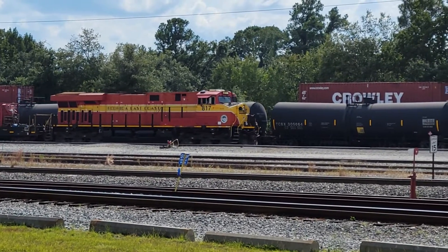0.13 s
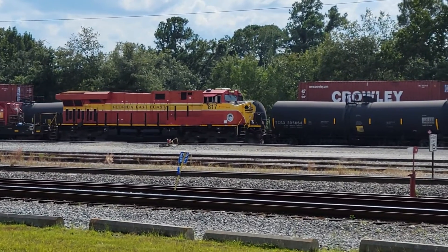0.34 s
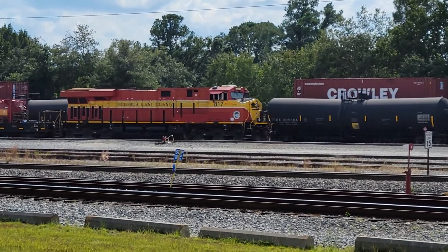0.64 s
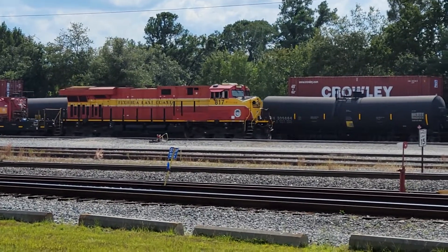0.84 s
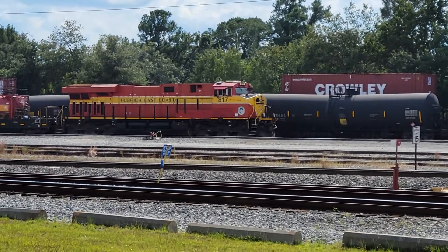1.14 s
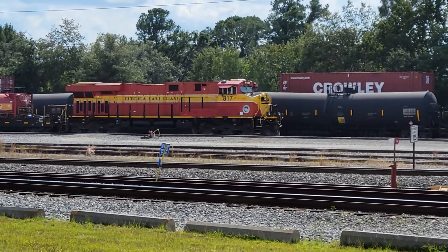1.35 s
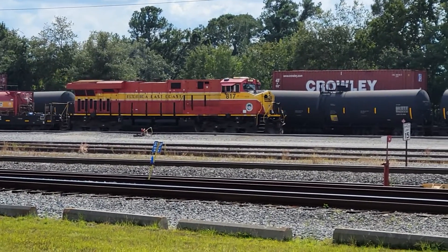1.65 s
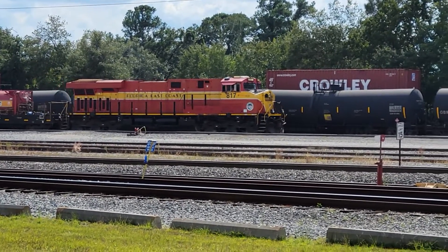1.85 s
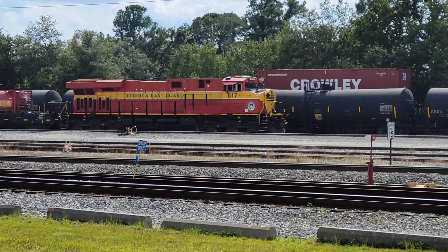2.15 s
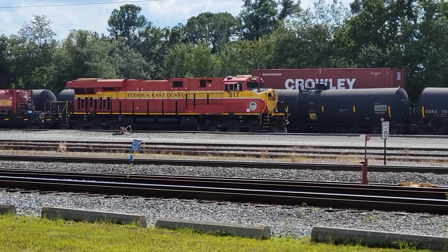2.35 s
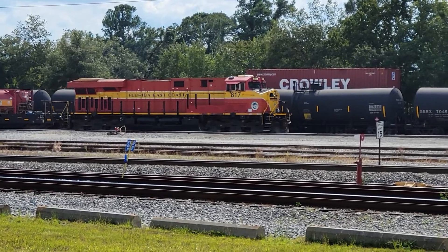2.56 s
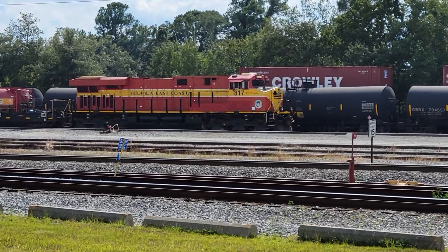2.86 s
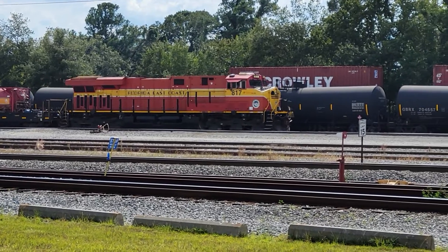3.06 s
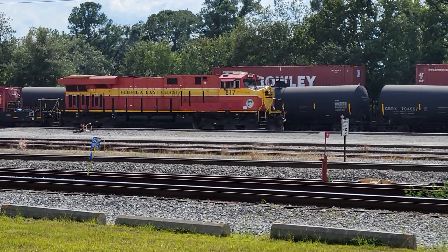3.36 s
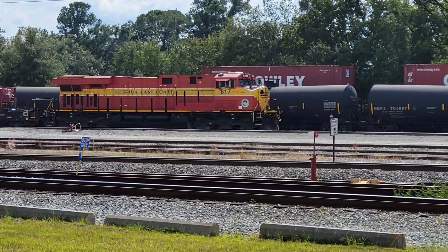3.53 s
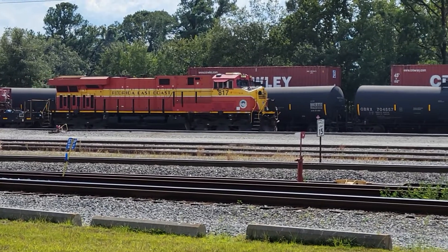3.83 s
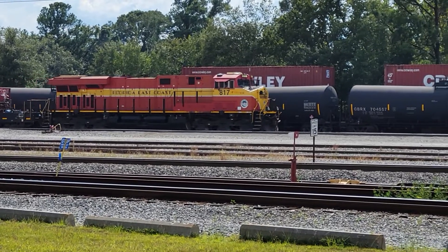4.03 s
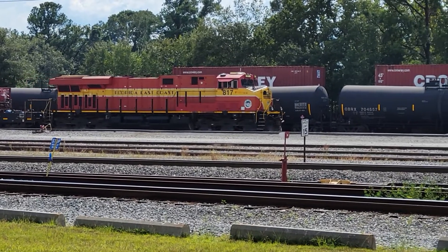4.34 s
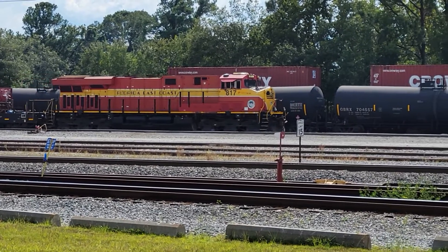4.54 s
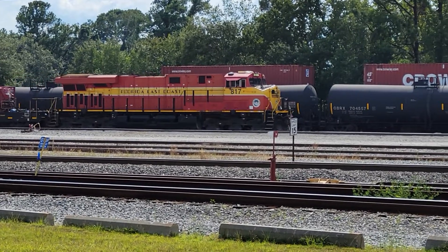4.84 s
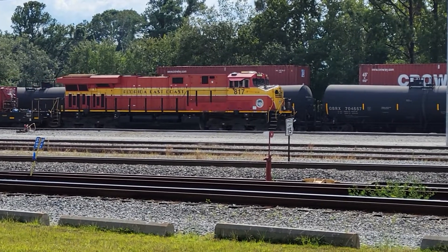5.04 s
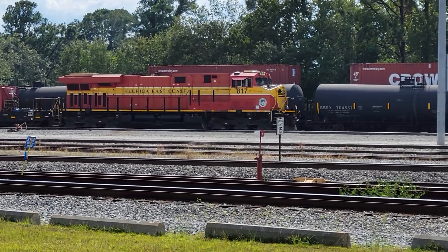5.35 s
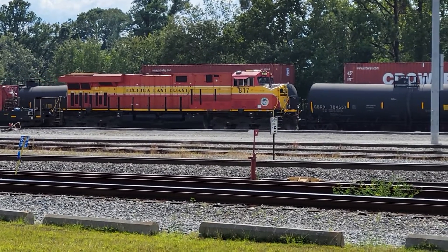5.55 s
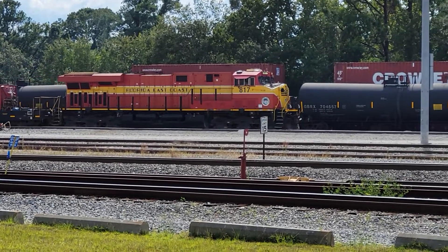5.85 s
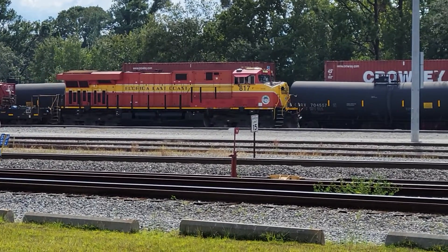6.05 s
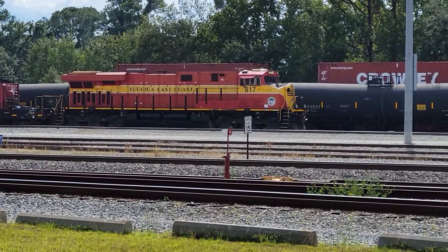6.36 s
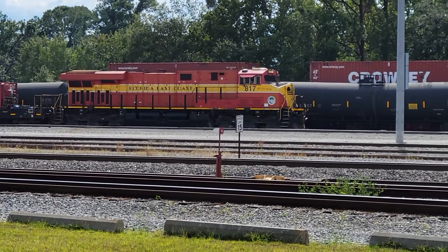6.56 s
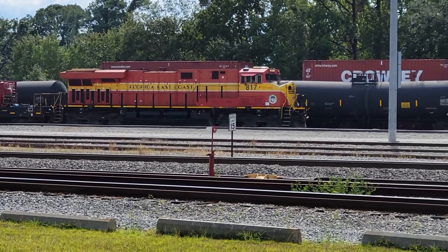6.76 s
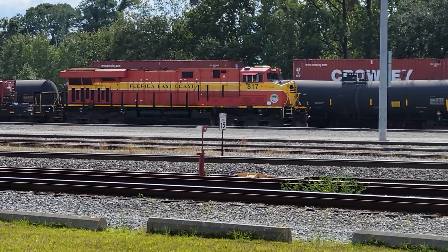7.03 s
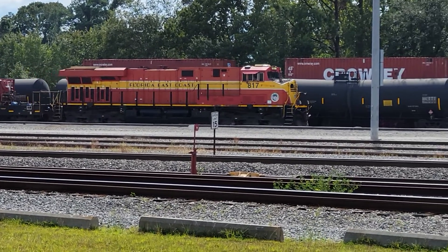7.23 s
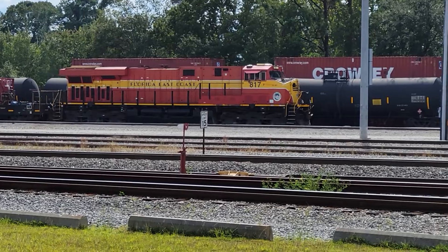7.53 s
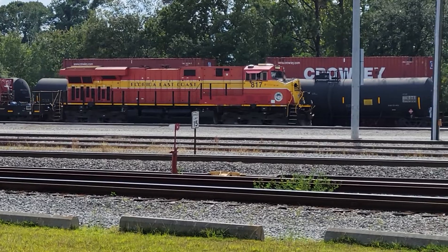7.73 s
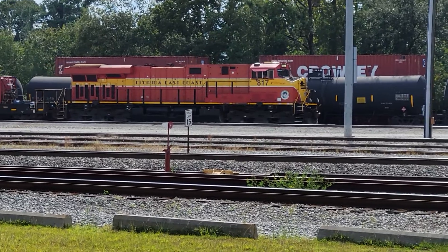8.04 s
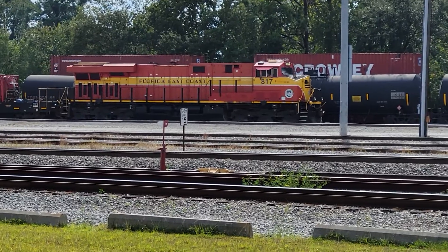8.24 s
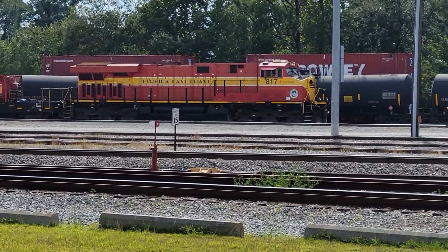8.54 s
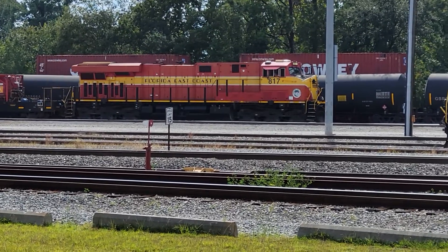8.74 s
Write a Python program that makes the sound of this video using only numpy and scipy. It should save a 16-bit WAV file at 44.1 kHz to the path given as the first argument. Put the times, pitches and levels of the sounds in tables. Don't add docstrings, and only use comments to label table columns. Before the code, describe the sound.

Two big diesel locomotives idle in an open rail yard with a deep, throbbing rumble, fan roar and valve clatter, while insects buzz faintly.

```python
import sys
import numpy as np
from scipy import signal
from scipy.fft import rfft, irfft, next_fast_len
from scipy.io import wavfile
from scipy.ndimage import uniform_filter1d, map_coordinates

SR = 44100
rng = np.random.default_rng(int(sys.argv[2]) if len(sys.argv) > 2 else 0)


def level_to_linear(level):
    exponent = np.asarray(level, float) / 20
    return 10 ** exponent


def to_wav(s):
    ch = np.atleast_2d(s).T
    pcm = np.round(np.clip(ch, -1, 1) * 32767)
    wavfile.write(sys.argv[1], SR, pcm.astype(np.int16))


N = 392049
T = np.arange(N) / SR

CREEP_HZ, STAND_HZ = 4.865, 4.8331

# crank_angle_deg, level_db
CREEP_FIRING = [(31.8, 3.4), (126.5, 1.5), (163.0, 5.7), (234.1, -1.2), (270.2, 4.8), (367.4, -4.1),
                (399.1, -1.3), (467.4, -0.1), (502.6, 4.5), (586.5, -4.1), (643.4, -5.3), (708.8, -1.5)]
STAND_FIRING = [(8.6, -7.4), (91.0, -13.8), (127.9, -1.8), (133.5, -7.0), (246.5, -8.2), (290.8, -12.7),
                (383.2, -8.5), (401.8, -8.1), (508.8, 2.7), (582.7, -3.1), (604.0, -1.8), (626.2, -3.0)]
# pitch_hz, width_hz, level_db
CREEP_STACK = [(58.8, 6.0, -22.4), (74.7, 6.0, -24.5), (95.0, 10.0, -37.4), (168.3, 15.0, -44.6)]
STAND_STACK = [(53.1, 14.7, -20.6), (58.4, 27.5, -23.8), (94.6, 32.5, -37.6), (196.1, 22.7, -69.9)]
# pitch_hz, level_db (of each multiple of the cycle rate)
KNOCK = [(100, -71.5), (130, -43.5), (185, -44), (250, -51), (320, -60), (450, -66.5), (800, -72.5),
         (1200, -80)]
# time_s, direct_gain, far_row_gain, near_row_gain
ECHO_PATHS = [(0.0, .41, .57, .29), (1.11, .6, .37, .3), (2.22, .59, .28, .25), (3.33, .43, .24, .18),
              (4.44, .38, .45, .27), (5.56, .36, .56, .14), (6.67, .4, .63, .18), (7.78, .47, .4, .26),
              (8.89, .61, .5, .15)]
# pitch_hz, level_db
HUMS = [(165.7, -38), (207.8, -46.5), (211, -49.5), (226.7, -44.5), (218.7, -36.5), (235.3, -44),
        (268.4, -45.5), (296, -54.5), (368, -54), (459.6, -61), (516.5, -62.5), (636, -58.5), (751, -59.5),
        (1158, -57.5)]
# pitch_hz, level_db (per Hz)
RUMBLE = [(15, -27), (30, -7.5), (60, -1.5), (100, -5), (120, -8.5), (180, -8.5), (250, -17), (320, -21.5),
          (400, -35), (600, -44), (1200, -88)]
# pitch_hz, level_db (per Hz)
FANS = [(210, -34.5), (350, -8.5), (575, -16.5), (724, -2), (851, -11.5), (976, -3), (1410, -3),
        (1590, -5.5), (1850, -0.5), (2500, -14), (2700, -8.5), (3510, -32.5), (5940, -120)]
# pitch_hz, width_hz, level_db
DUCTS = [(720, 170, -8), (972, 71, 1.5), (1404, 51, -0.5), (1875, 95, 2)]
# pitch_hz, level_db (per Hz)
CLATTER = [(880, -33), (1500, -5.5), (1600, -5.5), (1870, 0.5), (2060, 1), (2370, -7.5), (2510, -16),
           (3200, -10), (4470, -18.5), (4880, -12.5), (6760, -19), (8290, -27), (9370, -42), (10500, -38.5),
           (13600, -66.5), (22000, -120)]
# pitch_hz, width_hz, level_db
CASING = [(2320, 100, 0), (2753, 120, 4), (3260, 100, -4.5), (4137, 75, 1.5), (4900, 100, -5)]
# crank_angle_deg, rise_db, width_deg
VALVES = [(5, 4, 40), (95, 1.5, 15), (286, 0.8, 140), (370, 1.5, 38), (510, 2, 36), (625, 1.5, 6.6)]
# time_s, level_db
CARRY = [(0, 0), (.55, -.5), (1.45, 3), (1.8, -2), (2.7, -2), (3.4, -0.5), (3.65, -3), (3.9, -1.5),
         (4.2, 0.5), (4.7, 0.3), (5.3, 0.5), (6.4, 1), (7.3, 1), (8.89, .5)]
# pitch_hz, level_db (per Hz)
TREES = [(5200, -34.5), (8800, -4), (9500, -12.5), (10800, -9), (12200, -2.5), (13400, -2.5), (14200, -8.5),
         (15700, -10), (17000, -12)]
# pitch_hz, level_db, fade_by_60_db_s
WING = [(13550, 8, .008), (13050, 7, .008), (11960, -13, .06)]
# start_s, peak_db, pitch_hz
SPITS = [(0.825, -31, 2840), (1.072, -28, 2790), (1.158, -30.5, 3700), (4.289, -31.5, 3260),
         (4.51, -34, 3250), (5.222, -28, 6000), (6.05, -32, 6500), (6.109, -29, 4140), (7.284, -25.5, 2730),
         (7.402, -32.5, 3470), (7.825, -23.5, 3100), (8.018, -31.5, 3240), (8.53, -31, 6000),
         (8.623, -35, 2730)]
# start_s, end_s, start_pitch_hz, end_pitch_hz, level_db
FLANGE = [(2.48, 3.1, 5670, 5680, -53.5), (2.62, 3.12, 7460, 7480, -63), (2.82, 3.12, 8310, 8320, -65),
          (2.85, 3.2, 4860, 4840, -59), (2.42, 2.85, 9950, 10000, -73), (3.0, 3.55, 10200, 10320, -72)]
# pitch_hz, likeness (1 = the same)
ALIKE = [(60, 1), (130, 0.83), (290, 1), (640, 0.35), (1410, 0.63), (3100, 0.69), (6820, 0.17),
         (15000, 0.32)]
# pitch_hz, lead_radians
LEAD = [(30, 0.5), (70, 0.29), (140, -0.38), (300, 0.63), (2300, -0.24), (2600, 1.5), (4100, 0.98),
        (7000, 0.1), (10600, 2), (12700, -0.5), (15200, -11)]
# pitch_hz, difference_db
TILT = [(60, -1.0), (150, -0.5), (380, -1.0), (950, -2), (2380, 0.5), (5980, -2.5), (15000, 5.5)]


def unit(x):
    return x / np.sqrt(np.mean(x ** 2) + 1e-20)


def along(points, hz):
    f, value = np.transpose(points)
    return np.interp(np.log(hz + 1), np.log(f + 1), value)


def curves(rows):
    s, *columns = np.transpose(rows)
    return [np.interp(T, s, column) for column in columns]


def wobble(rate):
    knots = rng.standard_normal(int(N * rate / SR) + 4)
    return map_coordinates(knots, [T * rate])


def modes(rows, f):
    total = 0
    for k, (centre, width, db) in enumerate(rows):
        total = total + (-1) ** k * level_to_linear(db) * 1j * f * width / (centre ** 2 - f ** 2 + 1j * f * width)
    return total


def filtered(x, response):
    m = next_fast_len(N + 8192)
    return irfft(rfft(x, m) * response(np.fft.rfftfreq(m, 1 / SR)), m)[..., :N]


def rush(gain, patchy_db, banded_db):
    z = signal.stft(rng.standard_normal((2, N)), nperseg=512)[2]
    patches = uniform_filter1d(rng.standard_normal(z.shape[1:]), size=5, axis=0)
    patches = uniform_filter1d(patches, size=10, axis=1)
    bands = uniform_filter1d(rng.standard_normal(z.shape[1:]), size=70, axis=1)
    uneven = level_to_linear(patchy_db * unit(patches) + banded_db * unit(bands))
    pair = signal.istft(z * uneven, nperseg=512)[1][:, :N]

    def spread(hz):
        angle = np.arccos(np.clip(along(ALIKE, hz), -1, 1)) / 2
        return gain(hz) * np.array([np.cos(angle), np.sin(angle)])

    mid, side = filtered(pair, spread)
    return unit(np.array([mid + side, mid - side]))


def tone(hz, db, unsteady_db):
    phase = 2 * np.pi * np.cumsum(hz + 0 * T) / SR + 0.4 * wobble(2.504)
    level = np.sqrt(2) * level_to_linear(db + unsteady_db * wobble(2.2))
    return level * np.sin(phase + rng.uniform(0, 2 * np.pi))


def exhaust(firing, stack, cycle_hz, top_hz=330):
    order = np.arange(1, 257)
    f = order * cycle_hz
    angle, db = np.transpose(firing)
    beats = np.exp(-2j * np.pi * np.outer(order, angle) / 720) @ level_to_linear(db)
    body = modes(stack, f) / (1 + (f / top_hz) ** 6)
    knock = level_to_linear(along(KNOCK, f) + rng.normal(0, 4.7, len(f)))
    knock = knock * np.exp(2j * np.pi * rng.random(len(f)))
    cycle = irfft(np.r_[0, beats * body + knock], 4096) * 2048
    looped = np.r_[cycle, cycle[0]]
    return lambda s: np.interp(s * cycle_hz % 1, np.arange(4097) / 4096, looped)


def engines():
    direct, far, near = curves(ECHO_PATHS)
    creep = exhaust(CREEP_FIRING, CREEP_STACK, CREEP_HZ)
    detour_ms = .575 * T + .075 * T ** 2
    straight_ms = 1.05 - .1 * T
    moving = direct * creep(T - straight_ms / 1000)
    moving += far * creep(T - (37.05 + detour_ms) / 1000)
    moving += near * creep(T - (26.25 + detour_ms) / 1000)
    standing = exhaust(STAND_FIRING, STAND_STACK, STAND_HZ)(T)
    return level_to_linear(.1 + .2 * wobble(9)) * moving + level_to_linear(.1 + .2 * wobble(9)) * standing


def machinery():
    hums = sum(tone(hz, db, unsteady_db=2.0) for hz, db in HUMS)
    load_s, load_db = 2, 7
    blower_db = -41 + load_db / (1 + np.exp((load_s - T) / 0.33)) + .5 * T
    blower = tone(170.6 + 2.03 * T, blower_db, unsteady_db=2.5)
    pump = tone(279.7 + 1.6 * T, -57.5 + 1.77 * T, unsteady_db=2.5)
    return hums + pump + blower


def valve_gear():
    angle = T * CREEP_HZ * 720
    level_db = 0.1 * wobble(18)
    for at, rise_db, width in VALVES:
        away = (angle - at + 360) % 720 - 360
        level_db += rise_db * (1 + .3 * wobble(7.4)) * np.exp(-(away / width) ** 2)
    return level_db


def roar(carry_db):
    gear_db = valve_gear()

    def duct_gain(f):
        return level_to_linear(along(FANS, f)) * np.hypot(.8, 1.26 * abs(modes(DUCTS, f)))

    def casing_gain(f):
        ringing = np.hypot(1, 1.33 * abs(modes(CASING, f)))
        return level_to_linear(along(CLATTER, f)) * ringing / (1 + (2500 / (f + 1)) ** 8)

    rumble = rush(lambda f: level_to_linear(along(RUMBLE, f)), patchy_db=-0.2, banded_db=-2.5)
    fans = rush(duct_gain, patchy_db=1.33, banded_db=1.97)
    clatter = unit(level_to_linear(gear_db) * rush(casing_gain, patchy_db=1.2, banded_db=2.0))
    rumble_db = -32.5 + 1.09 * T + 0.3 * carry_db
    fan_db = -36 + 0.1 * T + 0.27 * carry_db + 0.28 * gear_db
    return level_to_linear(rumble_db) * rumble + level_to_linear(fan_db) * fans + level_to_linear(-38.5 + carry_db) * clatter


def insects(carry_db):
    click_hz, first_click_s = 36.665, .0052
    since = (T - first_click_s) * click_hz % 1 / click_hz
    ring = sum(level_to_linear(db - 60 * since / t60) * np.sin(2 * np.pi * hz * since) for hz, db, t60 in WING)
    near = level_to_linear(1.6 * wobble(9)) * ring * level_to_linear([[-1.5], [1.5]])
    far = level_to_linear(.8 * wobble(9)) * rush(lambda f: level_to_linear(along(TREES, f)), patchy_db=.35, banded_db=.9)
    return level_to_linear(-60 + .45 * carry_db) * (far + near)


def puffs(table, low, high, life, trim_db):
    out = np.zeros(N + SR)
    t = np.arange(SR // 10) / SR
    swell = t / life * np.exp(1 - t / life)
    for s, db, hz in table:
        band = signal.butter(2, [hz / low, hz * high], "band", fs=SR, output="sos")
        puff = unit(signal.sosfilt(band, rng.standard_normal(len(t))))
        out[round(s * SR):][:len(t)] += level_to_linear(db + trim_db) * puff * swell
    return out[:N]


def repeats(start, rate, db, scatter_db, hz, spread_hz, count):
    chance = rng.standard_normal((count, 2))
    times = start + np.arange(count) / rate
    return np.c_[times, db + scatter_db * chance[:, 0], hz + spread_hz * chance[:, 1]]


def loose_part():
    ticks = repeats(.047, 2 * CREEP_HZ, db=-57, scatter_db=2.5, hz=9650, spread_hz=300, count=15)
    return puffs(ticks, 1.06, 1.06, life=.006, trim_db=-4.0)


def air_spits():
    leak = repeats(5.137, CREEP_HZ, db=-21.5, scatter_db=1.5, hz=4200, spread_hz=600, count=8)
    return puffs(np.r_[SPITS, leak], 1.1, 1.34, life=0.01, trim_db=-17.5)


def flange():
    out = np.zeros(N)
    for start, end, hz, end_hz, db in FLANGE:
        u = np.clip((T - start) / (end - start), 0, 1)
        pitch = (hz + (end_hz - hz) * u) * (1 + 0.0017 * wobble(40))
        grip = np.sin(np.pi * u) ** .4 * level_to_linear(4.5 * wobble(16))
        out += grip * tone(pitch, db, unsteady_db=.5)
    return out


def scene():
    carry_db, = curves(CARRY)
    yard = engines() + machinery() + roar(carry_db) + insects(carry_db)
    return yard + loose_part() + air_spits() + flange()


def low_pass(x):
    return signal.sosfilt(signal.butter(12, 15660, fs=SR, output="sos"), x)


def record(dry):
    half = np.array([[.5], [-.5]])
    edge = np.clip(np.minimum(T, T[::-1]) / .004, 0, 1)

    def port_response(f):
        return level_to_linear(half * along(TILT, f)) * np.exp(1j * half * along(LEAD, f))

    ports = filtered(dry * edge, port_response)
    mix = ports / (1 + np.abs(ports) ** 16) ** (1 / 16)
    return low_pass(mix)


dry = scene()
out = record(dry)
to_wav(out)
```